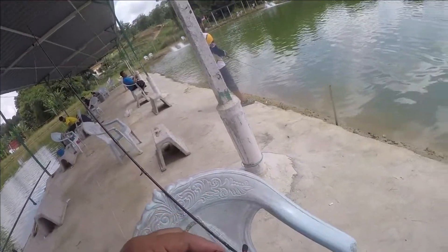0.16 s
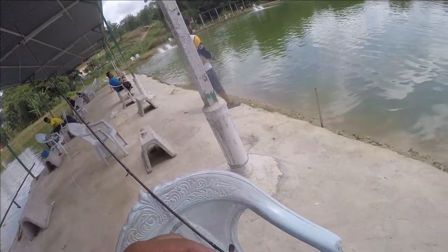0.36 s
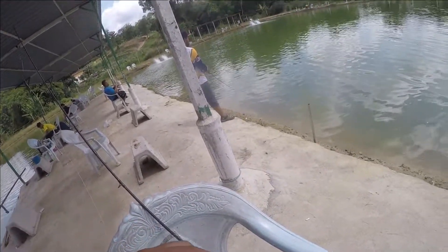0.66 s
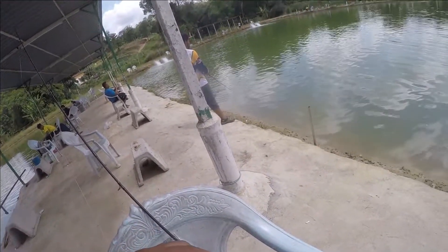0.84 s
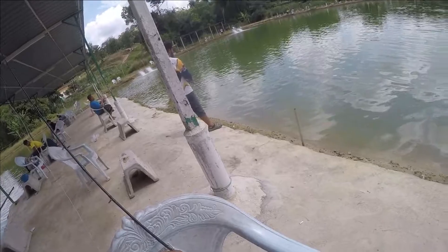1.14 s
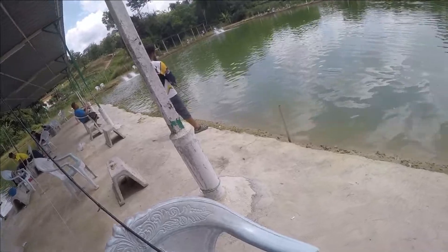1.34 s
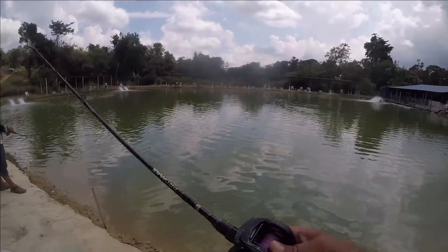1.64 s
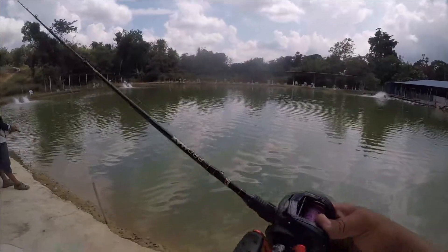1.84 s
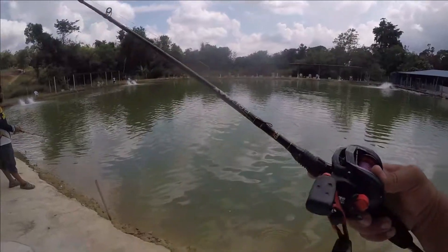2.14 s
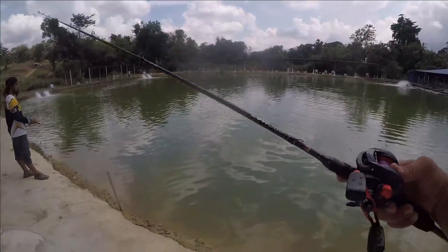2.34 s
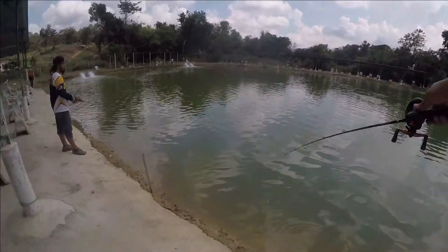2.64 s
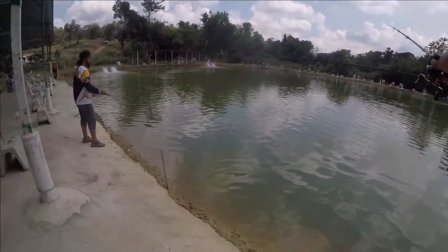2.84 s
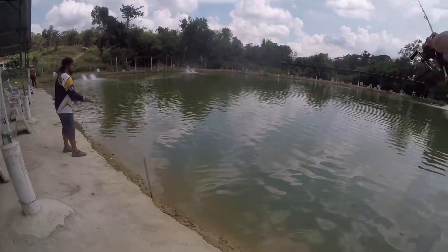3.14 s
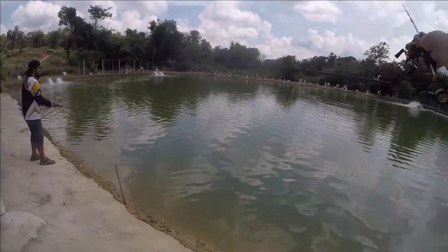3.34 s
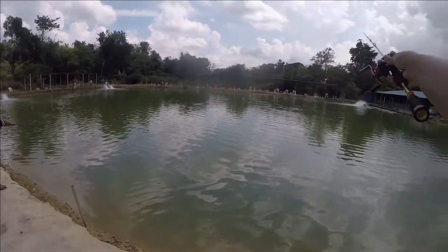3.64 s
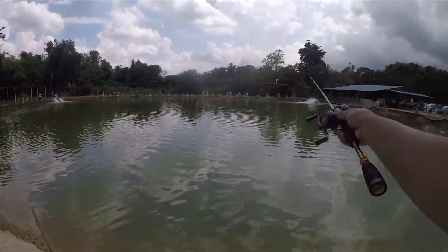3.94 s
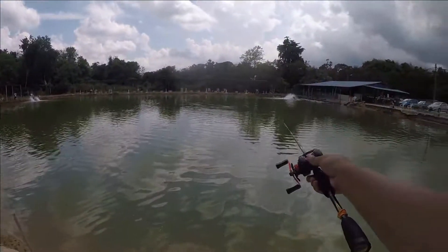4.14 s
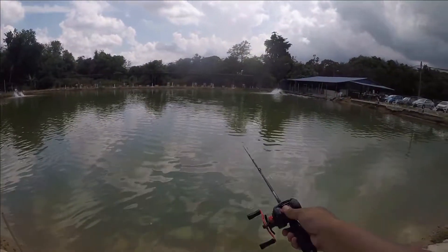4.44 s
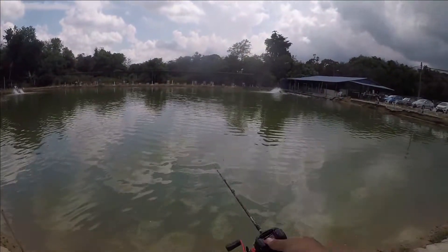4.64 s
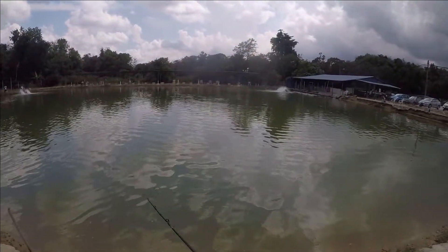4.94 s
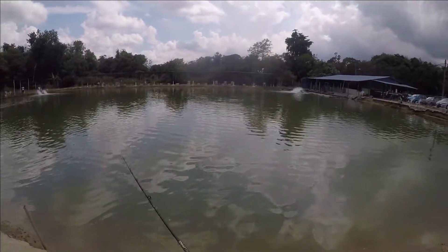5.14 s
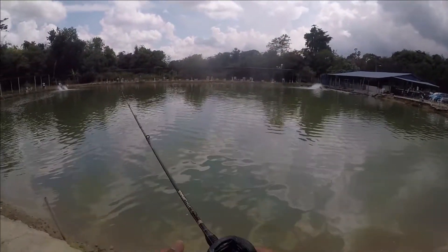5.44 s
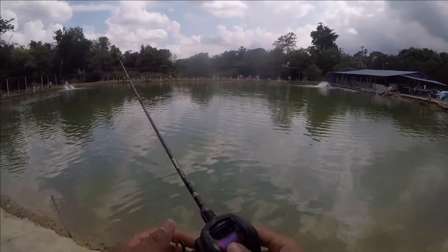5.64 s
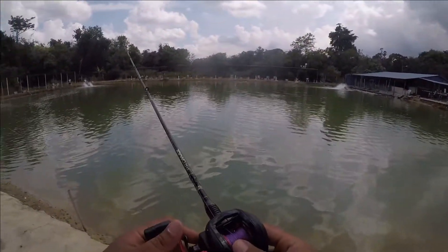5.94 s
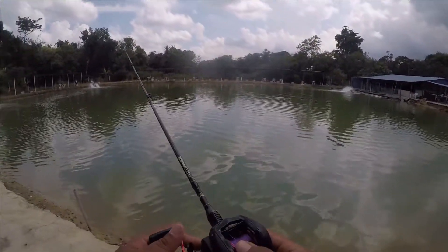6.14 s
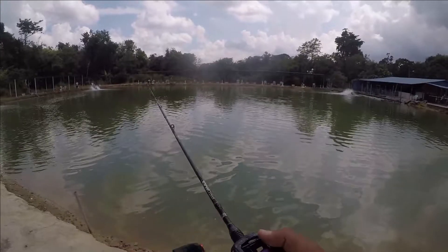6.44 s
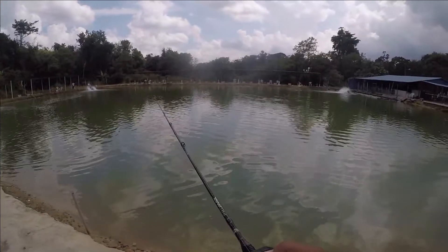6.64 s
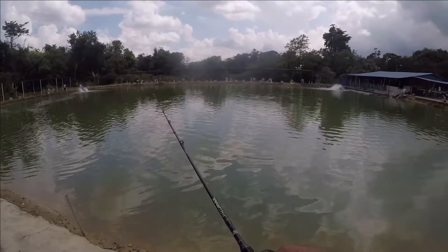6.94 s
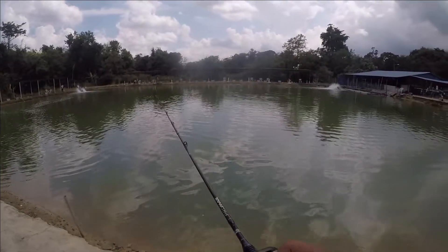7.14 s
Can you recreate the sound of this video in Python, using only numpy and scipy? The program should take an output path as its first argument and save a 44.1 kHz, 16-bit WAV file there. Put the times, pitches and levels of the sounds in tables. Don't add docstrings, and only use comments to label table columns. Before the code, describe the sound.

Pond aerators drone steadily over thrashed water; the hum jumps lower early on, a heavy low thud lands, later reel clicks and hard knocks.

```python
import sys
import numpy as np
from scipy import signal
from scipy.fft import rfft, irfft, next_fast_len
from scipy.io import wavfile

SR = 44100
rng = np.random.default_rng(int(sys.argv[2]) if len(sys.argv) > 2 else 0)


def invert_db(level):
    return 10 ** (np.asarray(level, dtype=float) / 20)


def store_wav(level_fs):
    pcm = np.round(np.clip(np.atleast_2d(level_fs), -1, 1) * 32767)
    wavfile.write(sys.argv[1], SR, pcm.T.astype(np.int16))


N = 321489
CHANGE_S = 1.426

# (time [s], shaft rate [Hz], level [dB], lean to first order [dB])
MOTOR_BEFORE = [(0, 72.1, -24, -13), (.4, 72.45, -23, -9), (.8, 72.2, -23.5, 6), (1.43, 71.2, -21, -9)]
# (time [s], shaft rate [Hz], level [dB], lean to first order [dB])
MOTOR_AFTER = [(1.43, 56.8, -25.5, 1), (1.85, 57.15, -20.5, -6.5), (2.1, 56.3, -20.5, 5.5),
               (2.5, 56.57, -18, -4.5), (3.15, 56.12, -23, 4.5), (3.8, 55.55, -18.5, -2.5),
               (4.7, 55.27, -19, 1), (5.3, 54.7, -20, 1.5), (5.75, 54, -24.5, 2.5), (6.1, 53.9, -23, 3),
               (6.8, 52.83, -25, 6.5), (7.29, 52.88, -31, 4)]
# (multiple [-], level re motor [dB], share of lean [-])
SHAFT_ORDERS = [(1, 1, 1.0), (2, 0.5, -0.43), (3, -6.5, 0.071)]
# (multiple [-], start level [dB], end level [dB])
WEAK_ORDERS_BEFORE = [(1.33, -25.5, -21), (2.499, -29.5, -25.5), (3.397, -37.5, -34)]
# (multiple [-], start level [dB], end level [dB])
WEAK_ORDERS_AFTER = [(4, -36, -52), (6, -46, -35)]
# (time [s], frequency [Hz], level [dB])
FAR_MOTOR = [(5.5, 93.7, -56), (5.9, 95.5, -17.5), (6.3, 97.14, -21), (6.8, 98.3, -20.5), (7.29, 101, -29)]
# (frequency [Hz], level [dB rms])
GEAR_WHINES = [(474, -40.5), (523, -37.5), (631, -39)]
# (frequency [Hz], density [dB/Hz])
CHURN_SPECTRUM = [(60, 5), (120, -1.5), (200, -4.5), (300, -7.5), (480, -10.5), (590, -20.5), (750, -17),
                  (1000, -27.5), (1400, -20)]
# (frequency [Hz], density [dB/Hz])
SPRAY_SPECTRUM = [(700, -8.5), (1100, 3.5), (1400, 0), (1750, -1), (2050, -5.5), (2900, -7), (4400, -17.5),
                  (5600, -26)]
# (time [s], level [dB])
WATER_LEVEL = [(0, -1), (1.0, -1.5), (1.6, -0.5), (2.55, 1.5), (2.75, 1), (3.3, -2.5), (3.8, 0), (4.3, 2.5),
               (5.0, 3), (5.65, 4), (5.9, 4), (6.5, 2.5), (7.05, 1.5), (7.29, -2.5)]
# (frequency [Hz], density [dB/Hz])
WIND_SPECTRUM = [(15, 4.5), (25, 4), (40, -0.5), (60, -1.5), (100, -4), (160, -10), (260, -28)]
# (time [s], level [dB])
BREEZE = [(0, -16), (.9, -17.5), (1.25, -22), (1.4, -14.5), (1.7, -18), (2.2, -22.5), (2.56, -22.5),
          (2.66, -14), (2.8, -16.5), (3.13, -13.5), (3.4, -21.5), (4.8, -27.5), (5.6, -20.5), (6.3, -23.5),
          (6.9, -21), (7.0, -15.5), (7.12, -13.5), (7.29, -23)]
# (frequency [Hz], level [dB], t60 [s])
REEL_MODES = [(1600, 4, .013), (2300, 4, .009), (2950, 1, .01), (3700, -8, .006), (4700, 1, .01),
              (6200, -3, .007), (8300, 1, .009), (9800, -2, .008), (11500, -3, .005)]
# (time [s], peak [dB], centre frequency [Hz])
CONTACTS = [(2.616, -34, 4000), (2.733, -35, 3000), (2.9392, -21, 11500), (2.9465, -32, 10000),
            (2.954, -37, 8800), (5.4286, -33, 1700), (5.885, -35, 7000), (6.5235, -28, 2500),
            (6.0535, -26, 1500), (6.0578, -17, 2200), (6.0885, -30, 8200), (6.0912, -20, 8200),
            (6.092, -26, 3000), (6.0944, -13, 1800), (6.098, -13, 4800), (6.0983, -18, 8600),
            (6.0986, -17, 1700), (6.1, -16, 3100)]
# (time of top speed [s], peak [dB])
SWEEPS = [
    (2.72, -36),
    (5.66, -39),
]
# (time [s], peak [dB], ring [Hz], t60 [s], L-R [dB])
KNOCKS = [
    (1.429, -12.5, 496.7, 0.13, -12),
    (2.696, 3.5, 201.2, 0.04, -4),
    (2.739, -22, 900, 0.014, 14),
    (2.744, -16, 550, 0.022, 13),
    (4.293, -6.5, 486, 0.055, -14),
    (6.542, -12, 556.7, 0.0499, 3),
    (7.16, -4, 492.6, 0.027, -15),
]
# (frequency [Hz], density [dB/Hz])
INSECT_SPECTRUM = [(7200, -24), (8300, 0), (9200, 4), (10200, -19), (11500, -25)]
# (time [s], level [dB])
CHORUS = [(0, -60), (.45, -56), (.6, -55), (1.0, -55.5), (1.42, -56), (1.44, -68), (2.75, -68), (2.95, -59),
          (3.4, -61), (3.65, -68), (7.29, -70)]
# (frequency [Hz], density [dB/Hz])
HISS_SPECTRUM = [(4000, -6.5), (5600, -3.5), (6400, -3.5), (7400, 1.5), (8400, -4.5), (10300, -6.5),
                 (12000, -21.5), (13500, -19), (16000, -55)]
# (frequency [Hz], gain [dB], phase lead [rad], likeness [0-1])
PORTS = [(40, 1, .1, 1), (160, 2.5, .2, .995), (260, 5, .25, .975), (430, 11, .2, .95), (570, 19, -.8, .65),
         (720, 15, -2.3, .9), (1100, 3, -2.1, .8), (1350, 0, -2.1, .15), (1750, -1, .5, .45),
         (2400, -1, 0, .1), (4000, .5, 0, .88), (5000, 0, -.5, .1), (7000, 2, -2.8, .45),
         (9000, 2.5, -1.5, .45), (14000, 0, 0, .6)]


def rms_one(x):
    return x / np.sqrt(np.mean(x ** 2) + 1e-20)


def in_time(rows):
    time_s, *columns = np.transpose(rows)
    return [np.interp(np.arange(N) / SR, time_s, column) for column in columns]


def at_hz(points, hz, axis=1):
    points = np.array(points)
    return np.interp(np.log(hz), np.log(points[:, 0]), points[:, axis])


def bandpass(x, order, low_hz, high_hz):
    return signal.sosfilt(signal.butter(order, [low_hz, high_hz], "band", fs=SR, output="sos"), x)


def drift(rate_hz):
    pole = np.exp(-80 * np.pi * rate_hz / SR)
    noise = rng.standard_normal(N // 40 + 2002)
    slow = signal.lfilter([1], [1, -2 * pole, pole * pole], noise)[2000:]
    return np.interp(np.arange(N) / 40, np.arange(len(slow)), rms_one(slow))


def tone(hz, wobble_db, rough_rad):
    phase = 2 * np.pi * np.cumsum(hz * np.ones(N)) / SR + rough_rad * drift(2.35)
    return np.sqrt(2) * invert_db(wobble_db * drift(13.0)) * np.sin(phase)


def patchy_noise(spectrum, patchy_db, flicker_hz, per_octave=3):
    out, together = 0, drift(7.5)
    low_end, high_end = spectrum[0][0], spectrum[-1][0]
    edges = low_end * 2 ** np.arange(0, np.log2(high_end / low_end), 1 / per_octave)
    white = rng.standard_normal((2, 2, N))
    for k, (low, high) in enumerate(zip(edges, edges[1:])):
        band = bandpass(white[k % 2], 2, low, high)
        flicker_db = patchy_db * (0.57 * together + drift(flicker_hz))
        out = out + invert_db(at_hz(spectrum, np.sqrt(low * high)) + flicker_db) * band
    return out


def ports(shared, other):
    pad = 448
    size = next_fast_len(N + 2 * pad)
    hz = np.maximum(np.arange(size // 2 + 1) * SR / size, 1)
    alike = np.clip(at_hz(PORTS, hz, axis=3), 0, 1)
    mirrored = np.pad([shared, other], [(0, 0), (pad, pad)], "reflect")
    near, apart = rfft(mirrored, size)
    turned = np.exp(1j * at_hz(PORTS, hz, axis=2)) * near
    mix = alike * turned + np.sqrt(1 - alike ** 2) * apart
    right = irfft(invert_db(at_hz(PORTS, hz)) * mix, size)[pad:pad + N]
    pair = np.array([shared, right])
    return pair / np.sqrt(np.mean(pair.mean(axis=0) ** 2))


def motor(rows, weak_orders):
    hz, level_db, lean_db = in_time(rows)
    lines = 0
    for multiple, db, share in SHAFT_ORDERS:
        lines = lines + invert_db(level_db + db + share * lean_db) * tone(multiple * hz, wobble_db=1.5, rough_rad=0.1)
    along = np.interp(np.arange(N) / SR, [rows[0][0], rows[-1][0]], [0, 1])
    for multiple, start_db, end_db in weak_orders:
        order_db = start_db + along * (end_db - start_db)
        lines = lines + invert_db(order_db) * tone(multiple * hz, wobble_db=3.0, rough_rad=0.21)
    return lines, 2 * np.pi * np.cumsum(hz) / SR


def machines():
    late = np.arange(N) >= CHANGE_S * SR
    hum_before, turn_before = motor(MOTOR_BEFORE, WEAK_ORDERS_BEFORE)
    hum_after, turn_after = motor(MOTOR_AFTER, WEAK_ORDERS_AFTER)
    far_hz, far_db = in_time(FAR_MOTOR)
    hum = np.where(late, hum_after, hum_before)
    hum = hum + invert_db(far_db) * tone(far_hz, wobble_db=0.0, rough_rad=0.28)
    gears = sum(invert_db(db - 6.0) * tone(hz, wobble_db=0.0, rough_rad=0.48) for hz, db in GEAR_WHINES)
    pair = ports(hum + gears, 0 * hum) * np.std(hum) * invert_db(-0.3)
    return pair, np.where(late, turn_after, turn_before)


def churn(shaft_phase):
    level_db = -21 + 0.55 * in_time(WATER_LEVEL)[0]
    throb = 1 + 0.05 * np.sin(shaft_phase)
    return invert_db(level_db) * throb * ports(*patchy_noise(CHURN_SPECTRUM, patchy_db=0.06, flicker_hz=7.6))


def spray():
    level_db = -40 + 0.75 * in_time(WATER_LEVEL)[0]
    return invert_db(level_db) * ports(*patchy_noise(SPRAY_SPECTRUM, patchy_db=1.0, flicker_hz=18.0, per_octave=4))


def wind():
    level_db = in_time(BREEZE)[0] + 2.0
    return invert_db(level_db) * ports(*patchy_noise(WIND_SPECTRUM, patchy_db=2.0, flicker_hz=4.9, per_octave=2))


def struck(events, crack, rise_cycles, size):
    out, t = np.zeros((2, N)), np.arange(size) / SR
    noise = rng.standard_normal((len(events), 2, size))
    for (time_s, peak_db, hz, t60_s, pan_db), grit in zip(events, noise):
        grit = rms_one(bandpass(grit, 1, hz * 0.72, min(hz * 1.18, 19000)))
        envelope = invert_db(-60 * t / t60_s) * np.minimum(t * hz / rise_cycles, 1)
        body = (np.sin(2 * np.pi * hz * t) + crack * grit) * envelope
        sides = invert_db([[pan_db / 2], [-pan_db / 2]])
        at = round(time_s * SR)
        out[:, at:at + size] += (invert_db(peak_db) * body * sides)[:, :N - at]
    return out


def knocks():
    return struck(KNOCKS, crack=0.06, rise_cycles=1.5, size=SR // 8)


def reel():
    slope_db_per_octave, pan_db, floor_db = 17, 2.5, -55
    rings = []
    for time_s, peak_db, centre_hz in CONTACTS:
        for hz, db, t60_s in REEL_MODES:
            ring_db = peak_db + db - slope_db_per_octave * abs(np.log2(hz / centre_hz))
            if ring_db > floor_db:
                rings.append((time_s, ring_db, hz, t60_s, pan_db))
    return struck(rings, crack=0.5, rise_cycles=0.5, size=SR // 40)


def swish():
    rise_db_per_s, fall_db_per_s = 55, 90
    grains = rng.standard_normal((2, N)) * invert_db(2.2 * drift(60.0))
    air = bandpass(grains, 2, 750, 2200)
    t = np.arange(N) / SR
    sweep = 0
    for peak_s, db in SWEEPS:
        sweep = sweep + invert_db(db - np.maximum(rise_db_per_s * (peak_s - t), fall_db_per_s * (t - peak_s)))
    return sweep * rms_one(air + air[0]) * invert_db([[2.5], [-2.5]])


def insects():
    noise = patchy_noise(INSECT_SPECTRUM, patchy_db=0.9, flicker_hz=15.0, per_octave=5)
    return invert_db(in_time(CHORUS)[0]) * ports(*noise)


def hiss():
    return invert_db(-50.5) * ports(*patchy_noise(HISS_SPECTRUM, patchy_db=-0.86, flicker_hz=17.0, per_octave=5))


def scene():
    aerators, shaft_phase = machines()
    water = churn(shaft_phase) + spray()
    handling = knocks() + reel() + swish()
    return aerators + water + wind() + handling + insects() + hiss()


def band_limit(x):
    return signal.sosfilt(signal.butter(12, 15900, fs=SR, output="sos"), x)


def record(dry):
    heard = signal.sosfilt(signal.butter(4, 14000, fs=SR, output="sos"), dry)
    fade_out = np.minimum(np.arange(N, 0, -1) / 100, 1)
    heard = 1.2 * np.tanh(heard / 1.2) * fade_out
    heard[:, round(CHANGE_S * SR)] += invert_db(-15)
    return band_limit(heard)


dry = scene()
out = record(dry)
store_wav(out)
```